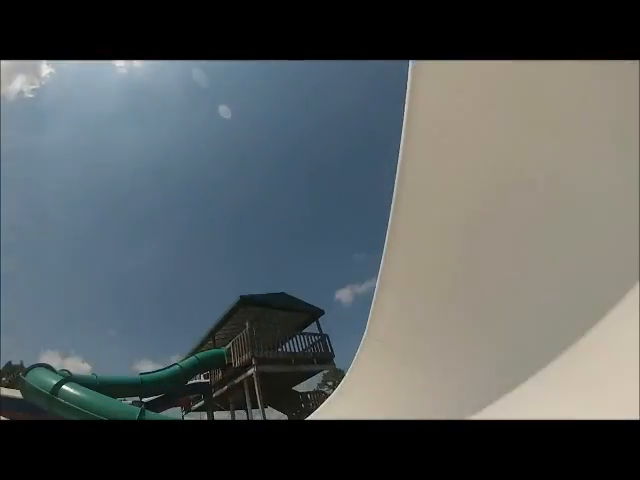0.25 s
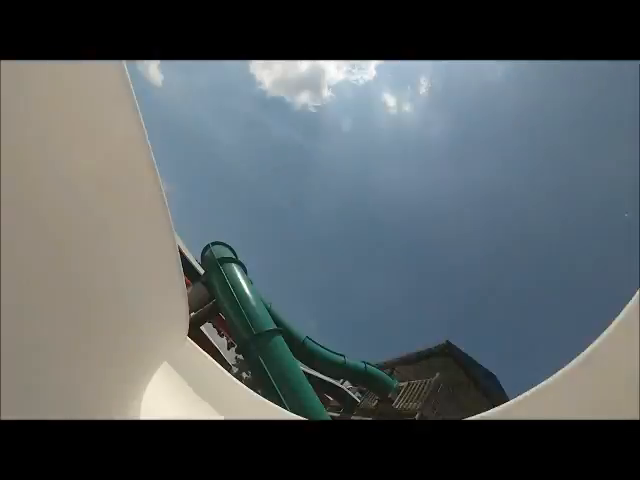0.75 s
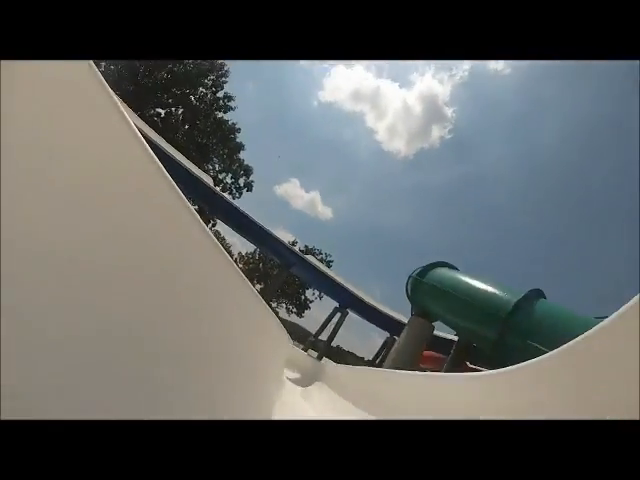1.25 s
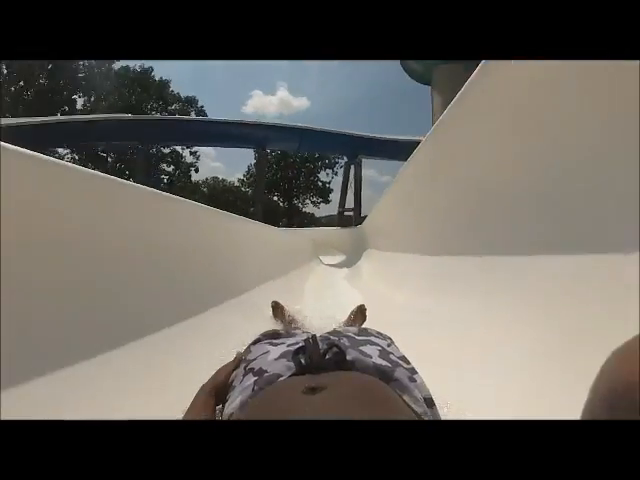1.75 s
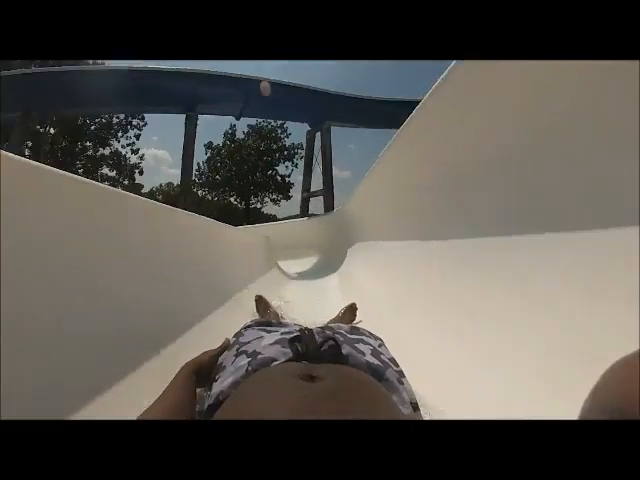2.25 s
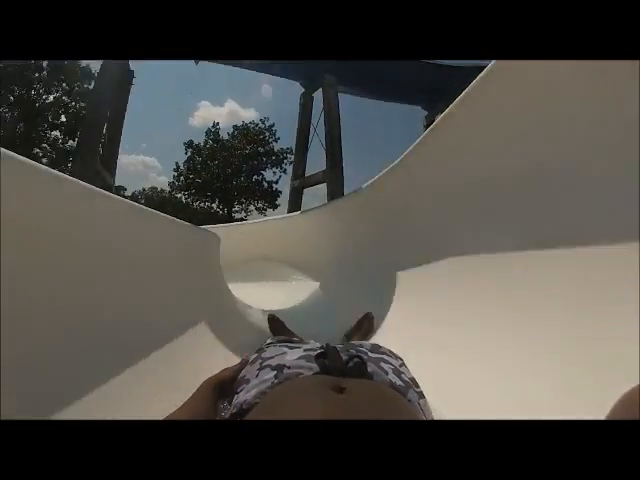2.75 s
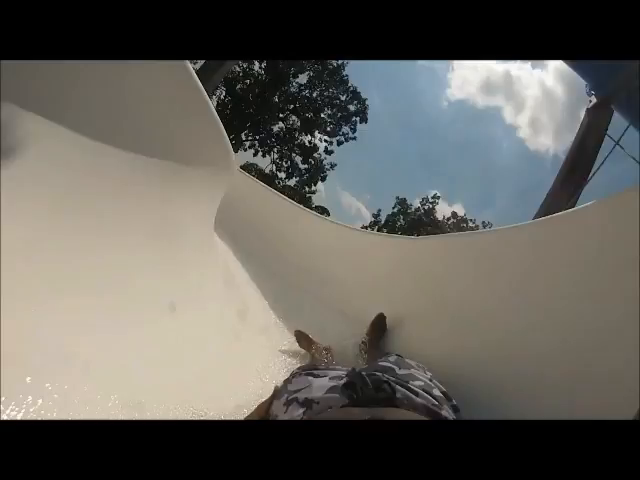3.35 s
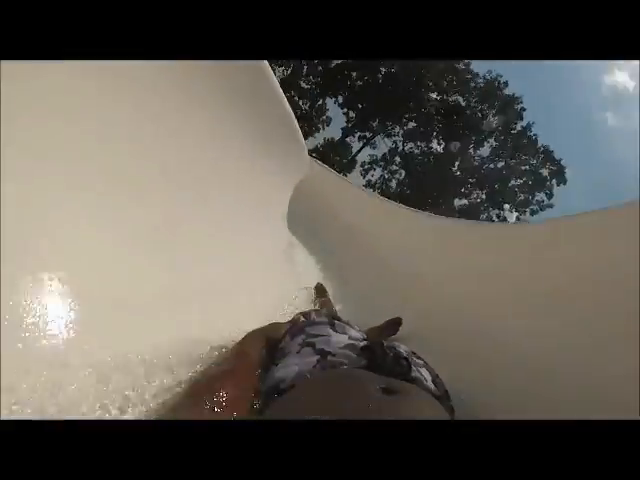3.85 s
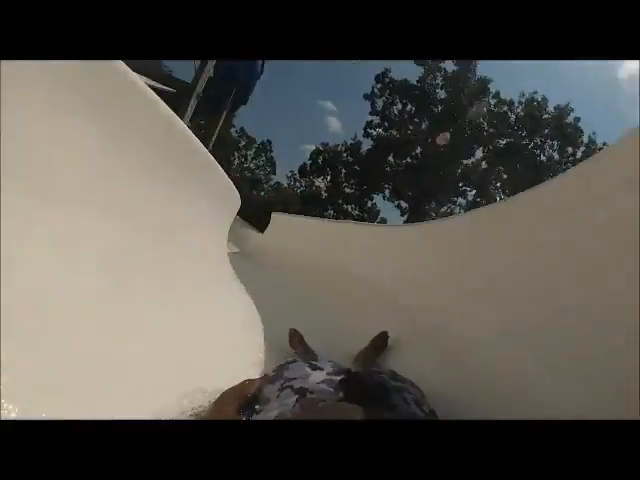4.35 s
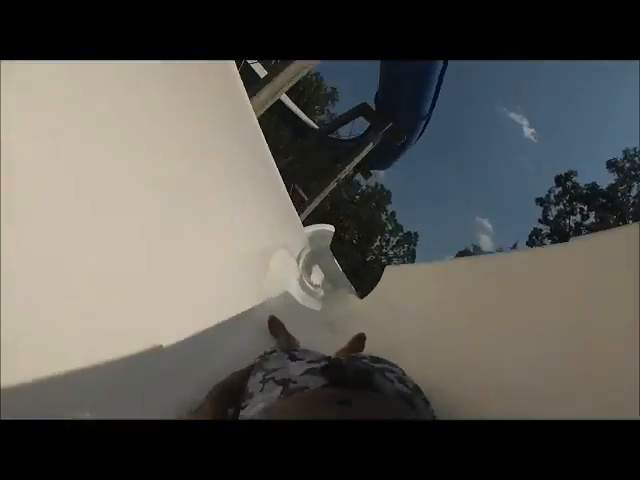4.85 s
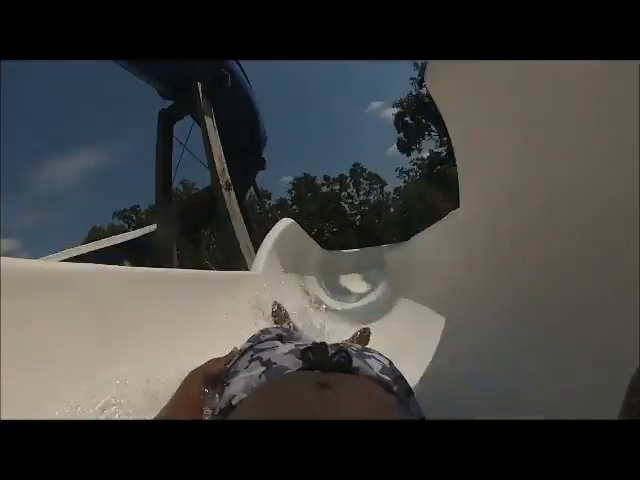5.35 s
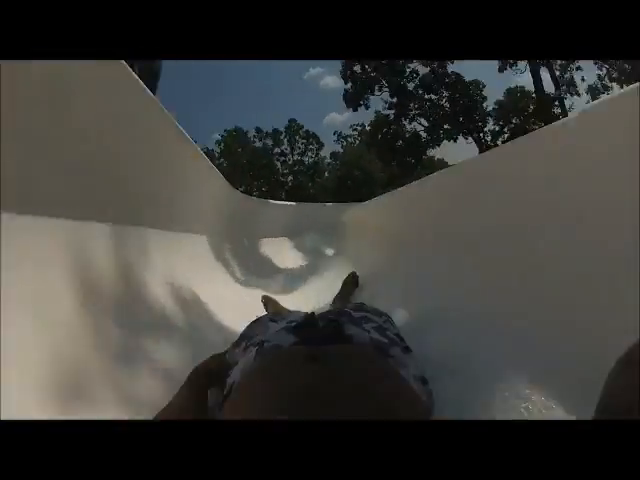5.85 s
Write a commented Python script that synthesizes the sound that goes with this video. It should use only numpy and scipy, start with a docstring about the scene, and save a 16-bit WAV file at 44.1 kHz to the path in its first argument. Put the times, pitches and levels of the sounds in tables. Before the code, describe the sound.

Close, muffled sound of a person sliding down a smooth water flume. Thin water hisses and fizzes steadily beneath the body, with deep slow wind buffets. A few bright drops and light washes lead into two tight groups of heavy thumps, clicks and water slaps on the camera shell. Afterwards there is only rushing water, faint gusts and tiny bubble plops, then one isolated low knock and a stronger rush as the ride goes on.

```python
"""An open fibreglass water flume: a rider slides down it with a camera in a waterproof housing.
The water film rushes under the body: bubbles and fizz in shaped hiss. Wind and, for a moment, the rider's
movement make a low rumble with slow gusts. In a bend, water and knocks hit the housing: low swings make
dull thumps, noise and clicks through its resonances make splashy slaps and knocks. Rubs and short spray
are bands of hiss, drops and fine spatter tick brightly, and bursting bubbles plop as rising tones."""
import sys
import numpy as np
from scipy import signal
from scipy.fft import rfft, irfft
from scipy.io import wavfile

SR = 44100
rng = np.random.default_rng(int(sys.argv[2]) if len(sys.argv) > 2 else 0)


def pcm_store(signal):
    """Save signal as 16-bit PCM."""
    levels = np.round(np.clip(np.atleast_2d(signal), -1, 1) * 32767)
    wavfile.write(sys.argv[1], SR, levels.astype(np.int16).T)


N = 268569
TIME = np.arange(N) / SR
FALL_60_DB = np.log(1000)   # a fall of 60 dB, as an exponent


def from_db(db):
    """Turn decibels into gain."""
    return 10 ** (np.asarray(db) / 20)


def rms_one(x):
    """Scale to an rms of 1."""
    return x / np.sqrt(np.mean(x ** 2) + 1e-20)


def curve(rows):
    """Draw straight lines between (seconds, dB) points, giving a value at every sample."""
    seconds, db = np.transpose(rows)
    return np.interp(TIME, seconds, db)


def add(out, s, sound):
    """Mix a short sound in, starting at s seconds."""
    at = max(round(s * SR), 0)
    out[at:at + len(sound)] += sound[:N - at]


def drift(rate_hz):
    """Wander at random around zero with an rms of 1, smoothly above the given rate."""
    step = 40   # samples between points of the slow curve
    pole = np.exp(-2 * np.pi * rate_hz * step / SR)
    noise = rng.standard_normal(N // step + 2002)
    slow = signal.lfilter([1], [1, -2 * pole, pole * pole], noise)[2000:]   # skip the filter's start
    return np.interp(np.arange(N) / step, np.arange(len(slow)), rms_one(slow))


def colour(x, spectrum):
    """Give a steady sound the balance of low and high in a spectrum; rms 1."""
    hz, db = np.transpose(spectrum)
    bins = np.maximum(np.fft.rfftfreq(N, 1 / SR), 1)
    gain_db = np.interp(np.log(bins), np.log(hz), db, left=-200, right=-200)
    return rms_one(irfft(rfft(x) * from_db(gain_db), N))


def resonate(x, hz, width_hz):
    """Ring at one pitch, with gain 1 there; the narrower the width, the longer the ring."""
    r = np.exp(-np.pi * width_hz / SR)
    push = np.array([1, 0, -1]) * (1 - r * r) / 2
    ring = [1, -2 * r * np.cos(2 * np.pi * hz / SR), r * r]
    return signal.lfilter(push, ring, x + 1e-18)


def dull(x, hz):
    """A soft contact rounds off the treble: two gentle low-passes in a row."""
    pole = signal.butter(1, hz, fs=SR, output="sos")
    return signal.sosfilt(pole, signal.sosfilt(pole, x))


def swing(hz, t60, push_s):
    """A brief push sets the air in the housing swinging until it dies away; peak 1."""
    t = TIME[:SR // 3]
    air = resonate(t * np.exp(-t / push_s), hz, FALL_60_DB / np.pi / t60)
    return air / np.abs(air).max()


def froth(per_s, low_hz, high_hz, cycles, spread_db, count=24):
    """Bubbles born at random each ring for some cycles at one of several pitches; rms 1."""
    born = np.flatnonzero(rng.random(N) < per_s / SR)
    size_db = spread_db * np.minimum(rng.exponential(1, len(born)), 4)
    sizes = from_db(size_db) * rng.choice([-1, 1], len(born))
    dealt = rng.integers(0, count, len(born))   # which pitch each bubble gets
    out = np.zeros(N)
    for k, hz in enumerate(np.geomspace(low_hz, high_hz, count)):
        births = np.bincount(born, sizes * (dealt == k), N)
        out += resonate(births, hz, hz * FALL_60_DB / np.pi / cycles)
    return rms_one(out)


# How strongly the water flows under the rider. Each row: time in seconds, strength in dB.
FLOW_STRENGTH = [(0.0, -59.5), (0.54, -59.5), (1.25, -60), (1.47, -57), (1.81, -57.5), (2.05, -60),
                 (2.95, -61.5), (3.43, -59.5), (3.85, -59), (4.16, -59), (4.32, -57.5), (4.87, -59.5),
                 (5.12, -57.5), (5.66, -58), (5.97, -54), (6.09, -56)]
# Balance of the rushing water. Each row: frequency in Hz, relative level in dB per Hz.
RUSH_SPECTRUM = [(150, 1), (250, -1.5), (344, -3), (445, -1.5), (500, -0.5), (551, -3), (766, -3),
                 (1040, 1.5), (1160, -2), (1860, -2), (2110, 1), (2590, -1.5), (2850, -11), (3200, -13.5),
                 (4160, -21), (7040, -120)]
# Balance of the fine spray. Each row: frequency in Hz, relative level in dB per Hz.
SPRAY_SPECTRUM = [(1650, -41), (2800, -3), (3890, -5.5), (4500, -3), (5430, -8.5), (6710, -5),
                  (9010, -14.5), (10300, -11.5), (12300, -13.5), (13000, -16)]
RUSH_DB = 2.5   # the rush, relative to the flow strength
CRUISE_DB, SPRAY_DB = -59.5, -66   # the usual flow strength; the spray at that flow
SPRAY_FOLLOWS = 1   # share of the flow's changes in dB that the spray follows


def water():
    """The sheet of water under the rider: bubbles and fizz in smooth hiss, surging together."""
    flow_db = curve(FLOW_STRENGTH)
    surge_db = drift(11.4)
    bubbles = froth(700, 389.4, 2966, cycles=41, spread_db=5.0, count=40)
    fizz = froth(4000, 3250, 8300, cycles=12, spread_db=7.0)
    rush = colour(rng.standard_normal(N) + from_db(-6.5 - 7.5) * bubbles, RUSH_SPECTRUM)
    spray = colour(rng.standard_normal(N) + from_db(-10) * fizz, SPRAY_SPECTRUM)
    rush_db = flow_db + RUSH_DB + surge_db + 0.18 * drift(35)
    spray_db = SPRAY_DB + SPRAY_FOLLOWS * (flow_db - CRUISE_DB) + surge_db
    return rush * from_db(rush_db) + spray * from_db(spray_db)


# Strength of the low rumble at the microphone, from wind and, around 1.4-1.6 s, the rider's
# movement. Each row: time in seconds, strength in dB.
RUMBLE_STRENGTH = [(0.0, -58), (0.57, -58.5), (0.76, -54), (1.22, -55), (1.41, -41.5), (1.51, -40.5),
                   (1.7, -53), (2.03, -54.5), (2.46, -55.5), (2.92, -54), (3.99, -51.5), (4.1, -54.5),
                   (5.12, -50.5), (5.41, -58.5), (6.09, -52.5)]
# Balance of the rumble. Each row: frequency in Hz, relative level in dB per Hz.
RUMBLE_SPECTRUM = [(8.8, -16.5), (15, 2), (28, -12), (62, -19.5), (97, -25), (344, -50), (400, -49.5),
                   (520, -72), (880, -120)]
# Single gusts. Each row: start in seconds, peak level in dB.
GUST_TIMES = [(0.851, -23), (2.278, -39), (2.733, -35.5), (3.126, -30.5), (3.214, -32), (3.401, -33.5),
              (3.843, -25), (4.437, -29.5)]
RUMBLE_DB, FLUTTER_DB = 11.5, 2   # the rumble, relative to its strength curve; its unsteadiness (rms)
GUST_HZ, GUST_T60_S, GUST_PUSH_S = 17.5, 0.25, 0.0043   # every gust is the same slow swing


def rumble():
    """Wind eddies and the rider's movement make a lumpy rumble, with a slow swing for each gust."""
    level_db = curve(RUMBLE_STRENGTH) + RUMBLE_DB + FLUTTER_DB * drift(11.4)
    out = colour(rng.standard_normal(N), RUMBLE_SPECTRUM) * from_db(level_db)
    for s, peak_db in GUST_TIMES:
        add(out, s, from_db(peak_db) * swing(GUST_HZ, GUST_T60_S, GUST_PUSH_S))
    return out


# Bright ticks: single drops, and the fine high spatter of two slaps (at 1.6185 and 1.6455 s).
# Each row: start in seconds, peak level in dB, main pitch in Hz, treble limit in Hz.
BRIGHT_TICKS = [(0.5079, -30.5, 5500, 14100), (0.8732, -38, 4940, 7500), (1.3477, -32, 5470, 8900),
                (1.3540, -42, 5400, 8000), (1.3685, -33, 5400, 7900), (1.6185, -49, 11500, 14000),
                (1.6455, -49, 11500, 14000)]
TICK_T60_S = 0.006


def ticks():
    """Water shatters on the shell in a few milliseconds of bright spatter."""
    out, t = np.zeros(N), TIME[:SR // 20]
    for s, peak_db, hz, top_hz in BRIGHT_TICKS:
        spatter = rng.standard_normal(len(t)) * np.exp(-FALL_60_DB * t / TICK_T60_S)
        bright = resonate(resonate(spatter, hz, 1600), hz, 7000)
        tick = signal.sosfilt(signal.butter(4, top_hz, fs=SR, output="sos"), bright)
        add(out, s, from_db(peak_db) * tick / np.abs(tick).max())
    return out


# Resonances of the housing. Each row: pitch in Hz, width in Hz, relative level in dB.
HOUSING_MODES = [(229, 95, 9), (426, 110, 0.5), (584, 210, -1.5), (1073, 186, 6), (1220, 64, -17),
                 (1657, 260, 2.5), (2010, 54, 1), (2430, 55, -42), (3440, 820, -31), (5600, 770, -10),
                 (11900, 4800, -9.5)]


def housing(force):
    """The housing rings with all its resonances at once when a force hits it."""
    return sum(from_db(db) * resonate(force, hz, width_hz) for hz, width_hz, db in HOUSING_MODES)


def spattered_shell():
    """Dense tiny impacts, strongly uneven in strength, keep the housing ringing."""
    return housing(rng.standard_normal(N) * from_db(9.3 * drift(310)))


def splash(shell, s, rise_s, t60, dull_hz):
    """The spattered shell's sound swells up to time s and dies away; its rms would be 1 if steady."""
    before, after = (s - TIME) / rise_s, (TIME - s) * FALL_60_DB / t60
    fade = np.where(TIME < s, before, after)
    return rms_one(dull(shell, dull_hz)) * np.exp(-np.minimum(fade, 30))


# Water washing over the housing. Each row: time of the peak in seconds, rms level there in dB,
# frequency in Hz above which it is dull.
WASH_TIMES = [(0.780, -49.5, 4000), (0.869, -51.5, 4000), (1.250, -48, 8000), (1.385, -38.5, 1000),
              (1.764, -46, 1200), (3.33, -51, 1800), (3.56, -60.5, 400), (3.819, -48.5, 1210),
              (5.115, -56, 3000)]
WASH_RISE_S, WASH_T60_S = 0.023, 0.19


def washes(shell):
    """Water running over the housing spatters it in a longer burst."""
    return sum(from_db(level_db) * splash(shell, s, WASH_RISE_S, WASH_T60_S, dull_hz)
               for s, level_db, dull_hz in WASH_TIMES)


# Bands of rubbing or spray: squeaky rubs when low, short hisses of spray when high.
# Each row: middle in seconds, rms level there in dB,
# half length in seconds (spread of a bell curve), pitch in Hz.
RUB_AND_SPRAY_BANDS = [(1.250, -60.5, 0.016, 5000), (1.305, -58.5, 0.0084, 3980),
                       (1.443, -35, 0.0046, 2040), (1.541, -50.5, 0.03, 1780), (1.6, -47, 0.015, 1620),
                       (1.66, -50, 0.027, 1630), (4.52, -70.5, 0.16, 5600)]
BAND_HZ, BAND_WIDTH_HZ = 1700, 230   # band width at this pitch; it grows with the square of the pitch


def rubs_and_spray():
    """Uneven noise swells in one band: narrow and squeaky when low, wide and hissy when high."""
    uneven = rng.standard_normal(N) * from_db(2.5 * drift(200))
    out = np.zeros(N)
    for s, level_db, half_s, hz in RUB_AND_SPRAY_BANDS:
        width_hz = BAND_WIDTH_HZ * (hz / BAND_HZ) ** 2
        band = rms_one(resonate(resonate(uneven, hz, width_hz), hz, 2 * width_hz))
        swell = np.exp(-((TIME - s) / half_s) ** 2 / 2)
        out += from_db(level_db) * band * swell
    return out


# Bubbles bursting close by. Each row: start in seconds, peak level in dB, starting pitch in Hz.
BUBBLE_BURSTS = [(1.3120, -33, 716), (3.6707, -46, 1580), (4.636, -45.5, 3060), (5.9455, -42.5, 2080),
                 (6.017, -45, 854)]
PLOP_T60_S = 0.017


def plops():
    """A bubble swells quickly and rings out, rising a little in pitch."""
    out, t = np.zeros(N), TIME[:SR // 8]
    for s, peak_db, hz in BUBBLE_BURSTS:
        shape = (1 - np.exp(-t * hz / 0.75)) * np.exp(-FALL_60_DB * t / PLOP_T60_S)
        tone = np.sin(2 * np.pi * hz * t * (1 + 0.013 * t / PLOP_T60_S))
        add(out, s, from_db(peak_db) * tone * shape / shape.max())
    return out


# Wet knocks, each a click with a slap of water. Each row: start in seconds, click peak in dB,
# slap rms at its peak in dB, slap rise in seconds, frequency in Hz above which both are dull.
WET_KNOCKS = [(1.3466, -16.5, -27, 0.00058, 4000), (1.3501, -20, -24.5, 0.0011, 2500),
              (1.4135, -16.5, -33, .001, 1180), (1.4261, -32, -30.5, .005, 1400),
              (1.4522, -23, -33, .009, 2190), (1.587, -28, -36, .001, 1290), (1.608, -33, -25, .006, 1900),
              (1.6140, -26.5, -27, 0.0027, 3070), (1.647, -39, -32, 0.0099, 2760),
              (1.6501, -25, -33, .002, 1280), (1.7422, -34, -35, 0.0065, 600), (5.042, -27, -55, .003, 141)]
SLAP_LAG_S, SLAP_T60_S = 0.0011, 0.027   # the slap peaks just after the click and dies quickly


def knocks():
    """A hard contact is one click; the softer it is, the duller the ring of the housing."""
    out = np.zeros(N)
    for s, peak_db, _, _, dull_hz in WET_KNOCKS:
        ring = housing(dull(signal.unit_impulse(SR // 10), dull_hz))
        add(out, s, from_db(peak_db) * ring / np.abs(ring).max())
    return out


def slaps(shell):
    """The slap of water with each knock spatters the housing in a short burst."""
    return sum(from_db(slap_db) * splash(shell, s + SLAP_LAG_S, rise_s, SLAP_T60_S, dull_hz)
               for s, _, slap_db, rise_s, dull_hz in WET_KNOCKS)


# Low thumps on the housing; the one at 1.616 s has a slower, deeper tail at 1.624 s.
# Each row: start in seconds, peak level in dB, pitch in Hz,
# number of swings until it has died away (by 60 dB).
LOW_THUMPS = [(1.3510, -2.5, 62, 2.6), (1.4135, -6.5, 97, 5.6), (1.4265, -6, 71.6, 2.67),
              (1.6158, -11.5, 131, 2.25), (1.6239, -17, 30, 1.56), (1.6486, -13.5, 35.4, 0.95),
              (5.0408, -12, 72, 4.1)]
PUSH_SHARE = 0.055   # the push time, as a share of the time that the swing takes to die away


def thumps():
    """Each thump or tail is a low swing; the sooner it dies, the more abrupt its push."""
    out = np.zeros(N)
    for s, peak_db, hz, swings in LOW_THUMPS:
        t60 = swings / hz
        add(out, s, from_db(peak_db) * swing(hz, t60, PUSH_SHARE * t60))
    return out


def scene():
    """Water and rumble run all along, with bubbles, rubs, spray and hits on the housing on top."""
    shell = spattered_shell()   # washes and slaps share it
    close = ticks() + washes(shell) + rubs_and_spray() + knocks() + slaps(shell) + thumps()
    return (water() + rumble() + plops() + close)[None]


def record(dry):
    """Cut the top treble steeply above 12.9 kHz."""
    steep = signal.ellip(10, .2, 70, 12900, fs=SR, output="sos")
    return signal.sosfilt(steep, dry)


dry = scene()
out = record(dry)
pcm_store(out)
```